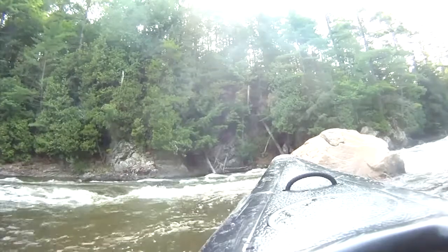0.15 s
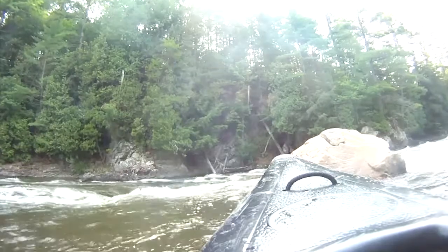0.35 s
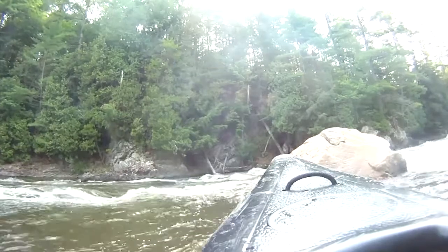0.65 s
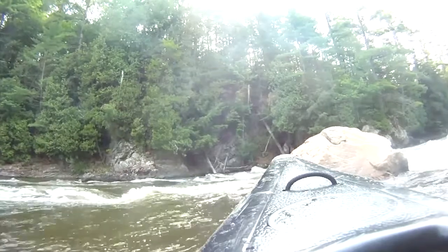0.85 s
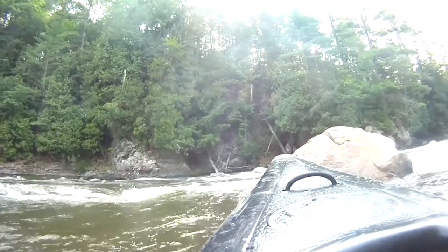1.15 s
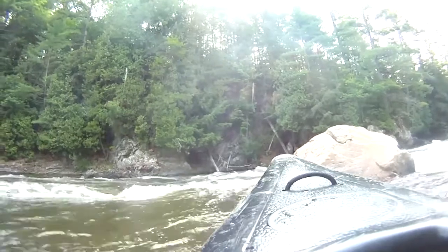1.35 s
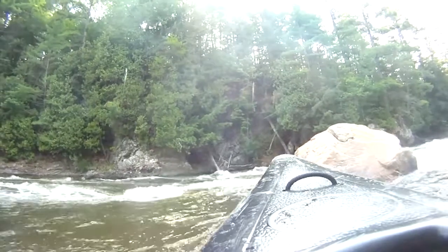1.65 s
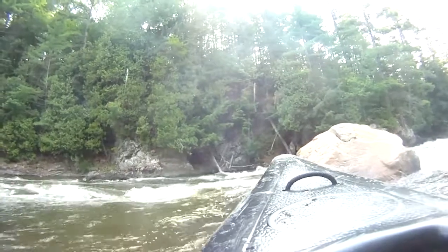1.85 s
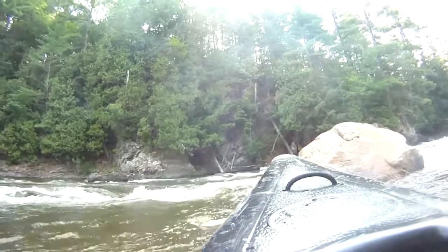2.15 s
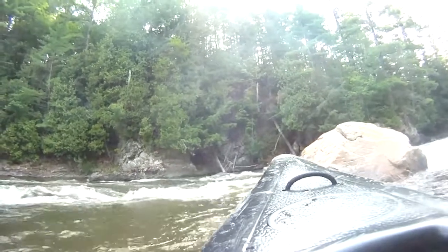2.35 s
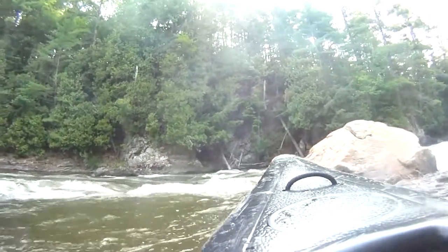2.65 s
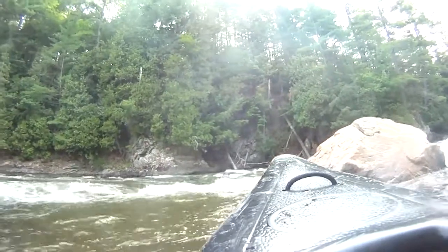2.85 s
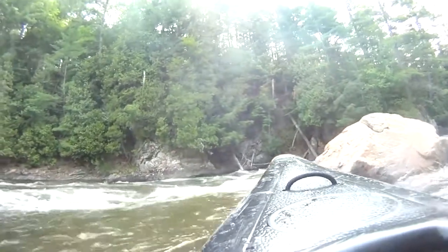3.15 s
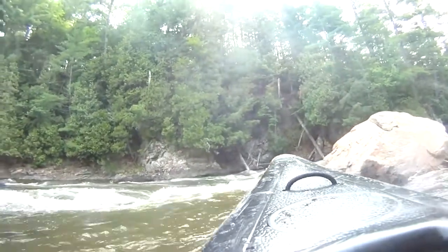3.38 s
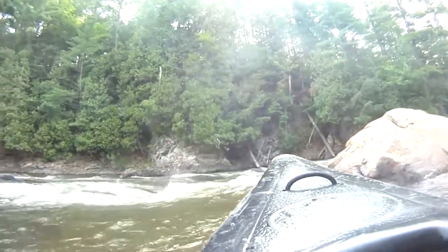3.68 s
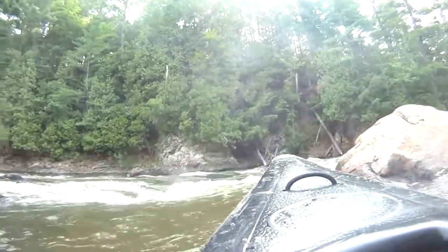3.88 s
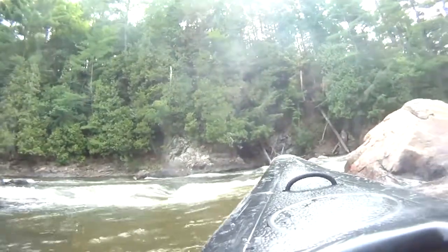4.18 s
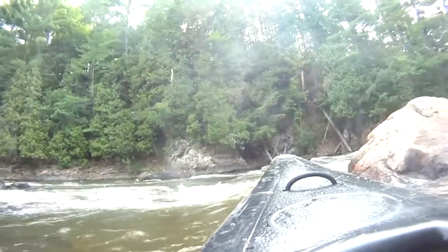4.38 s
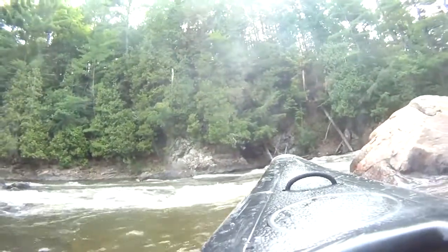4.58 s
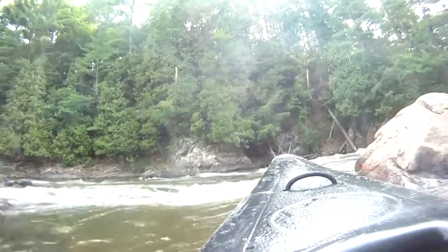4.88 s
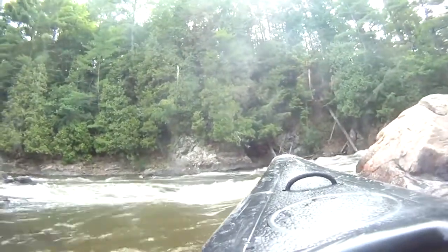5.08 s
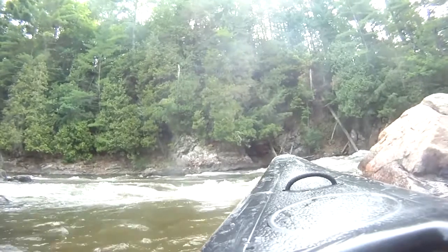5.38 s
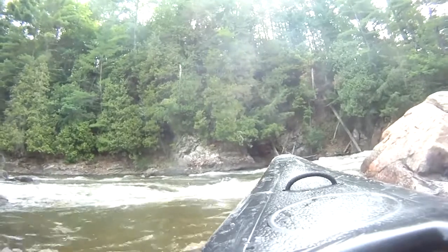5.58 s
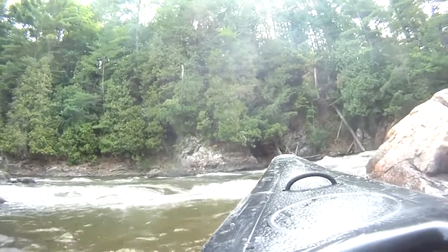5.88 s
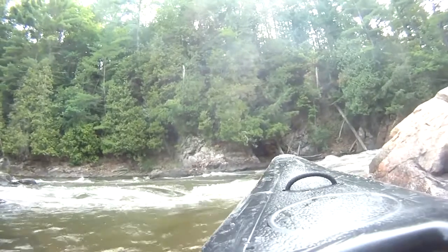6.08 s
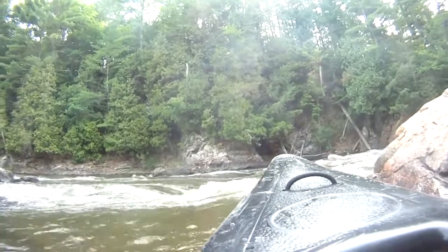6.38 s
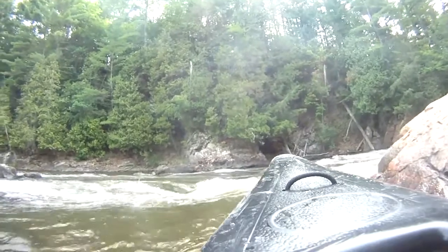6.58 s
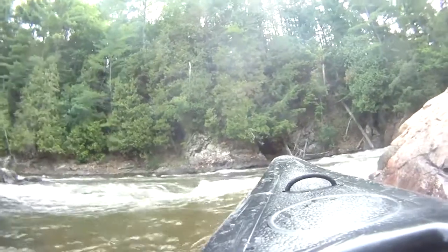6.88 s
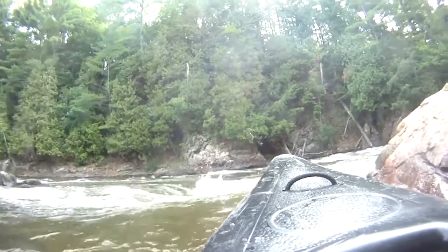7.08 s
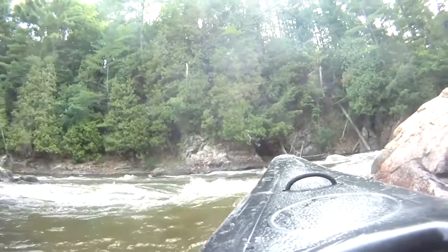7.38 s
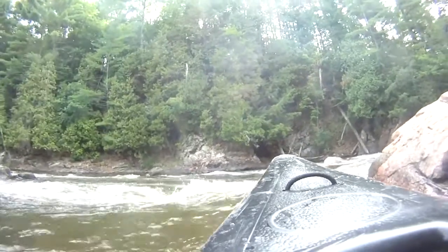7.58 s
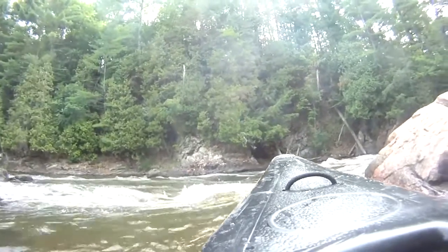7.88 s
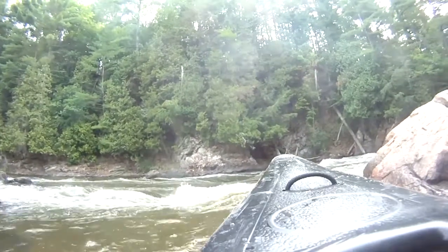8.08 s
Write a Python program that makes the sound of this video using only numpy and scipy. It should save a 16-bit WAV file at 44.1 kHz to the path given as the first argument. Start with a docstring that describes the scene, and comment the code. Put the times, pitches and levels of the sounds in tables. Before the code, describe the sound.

Heard from inside a waterproof case on a canoe, waves boom against the hull and set it rocking over a low, muffled rush of whitewater. The thumps come in uneven groups and grow heavier in the second half. Several sharp plastic knocks and short rattles cut through as the case jolts on its mount. Small bubbles, soft gurgles and a light dry crackle accompany the slaps.

```python
"""Canoe below a rapid

A canoe drifts below a river rapid, heard through a waterproof camera case fixed to its deck.
Countless bubbles merge into a steady, muffled rush; nearer ones plop singly. Waves slap the hollow
hull, which booms, rings and rocks on; a fine dry crackle follows the thumps, and water gurgles.
Harder jolts make the case knock and rattle on its mount. The recorder clips and holds its samples."""
import sys
import numpy as np
from scipy import signal
from scipy.fft import rfft, irfft, next_fast_len
from scipy.io import wavfile

SR = 44100
rng = np.random.default_rng(int(sys.argv[2]) if len(sys.argv) > 2 else 0)


def pcm_store(signal):
    """Save signal as 16-bit PCM."""
    levels = np.round(np.clip(np.atleast_2d(signal), -1, 1) * 32767)
    wavfile.write(sys.argv[1], SR, levels.astype(np.int16).T)


N = 362943
TIME = np.arange(N) / SR


def from_db(db):
    """Amplitude ratio for a level in decibels."""
    return 10 ** (np.asarray(db) / 20)


def unit_rms(x):
    """Normalisation to a root mean square of 1."""
    return x / np.sqrt(np.mean(x ** 2) + 1e-20)


def butterworth(x, hz, kind, order=2):
    """Maximally flat low- or high-pass filter."""
    sections = signal.butter(order, min(hz, .45 * SR), kind, fs=SR, output="sos")
    return signal.sosfilt(sections, x + 1e-18)


def drift(per_s):
    """Random modulation: straight lines between standard normal values."""
    knots = rng.standard_normal(N // 40)
    return np.interp(TIME * per_s, np.arange(len(knots)), knots)


def coloured_noise(spectrum, peaks=()):
    """Spectral shaping: white noise takes on a given slope and resonance peaks, at unit rms."""
    size = next_fast_len(N)
    hz = np.maximum(np.fft.rfftfreq(size, 1 / SR), 1)
    corner_hz, corner_db = np.transpose(spectrum)
    db = np.interp(np.log(hz), np.log(corner_hz), corner_db)
    for centre, width, height in peaks:
        db += height * np.exp(-((hz - centre) / width) ** 2)
    white = rfft(rng.standard_normal(size))
    return unit_rms(irfft(white * from_db(db), size)[:N])


def resonator(drive, hz, t60):
    """Damped oscillator: a unit impulse starts a unit sine that falls 60 dB in t60 seconds."""
    radius = np.exp(-np.log(1000) / (t60 * SR))
    angle = 2 * np.pi * hz / SR
    return signal.lfilter([0, np.sin(angle)], [1, -2 * radius * np.cos(angle), radius ** 2], drive + 1e-18)


def impulses(times, sizes):
    """Impulse train, with times in seconds."""
    return np.bincount(np.clip(times * SR, 0, N - 1).astype(int), sizes, N)


def chirp(hz):
    """Sine whose phase is the integral of its instantaneous frequency."""
    return np.sin(2 * np.pi * np.cumsum(hz) / SR)


def add(track, onset_s, sound):
    """Superposition of a sound on a track."""
    start = max(int(onset_s * SR), 0)
    track[start:start + len(sound)] += sound[:N - start]


def swell(age):
    """Envelope that rises from 0 to 1 at age 1, then decays."""
    return (age * np.exp(1 - age)) ** 2


# spectrum of the rapid inside the case: f/Hz, relative spectral level/dB
RAPID_SPECTRUM = [(20, 15.5), (45, 7.5), (85, 18), (130, 11), (250, 6.5), (480, 0.5), (1250, -4),
                  (1700, -0.5), (2700, -7.5), (3400, -1), (4300, -10), (5400, -9), (6000, -21.5)]
# transmission peaks of the case walls: f/Hz, width/Hz, gain/dB
WALL_PEAKS = [(695, 78, 8.5), (1063, 147, 9), (1406, 74, 8), (2079, 168, 9.5), (2392, 184, 11.5),
              (5010, 230, 7.5)]


def rapid(level_db, surge_db):
    """Incoherent summation: countless far bubbles merge into a rush that surges slightly."""
    return from_db(level_db + surge_db * drift(31)) * coloured_noise(RAPID_SPECTRUM, WALL_PEAKS)


def bubbles(per_s, level_db, t60_cycles):
    """Bubble resonance: single bubbles near the boat plop, each a damped sine."""
    births = rng.random(N) < per_s / SR
    drive = births * np.minimum(rng.exponential(1, N), 3)
    pitches = np.geomspace(600, 2500, 20)
    choice = rng.integers(0, len(pitches), N)
    plops = sum(resonator(drive * (choice == k), hz, t60_cycles / hz) for k, hz in enumerate(pitches))
    return from_db(level_db) * plops


# waves on the hull: t/s, boom level/dB, initial f/Hz, wash level/dB, rocking time/s, crackle (0-1)
WAVES = [(0.0, -16, 127, -24, 0, 0.73), (0.028, -13, 96, -40, 0.0047, 0), (0.14, -18.5, 115, -32, 0, 0.1),
         (0.178, -19.5, 200, -24.5, 0, 0), (0.349, -12.5, 114, -25.5, 0.12, 0.5),
         (0.529, -22.5, 126, -27.5, 0, 0.25), (1.130, -31.5, 377.6, -21, 0.0056, 0.8),
         (1.147, -14.5, 151, -34, 0.0079, 0), (1.377, -23, 267, -22.5, 0, 0),
         (1.407, -14.5, 113, -27, 0.11, .6), (1.922, -18.5, 229, -27, 0.15, 0.75),
         (2.234, -32, 83, -55, 0.013, 0), (2.916, -13.5, 215, -16, 0.055, 0.99),
         (3.37, -40.5, 92, -39.5, 0.057, 0), (4.032, -6, 269.5, -15, 0.1745, .6),
         (4.362, -15.5, 146.3, -20, 0.029, 0.88), (4.393, -19, 137, -25, 0.0056, 0),
         (4.83, -10, 227.7, -19, 0.17, 0.83), (5.056, -18, 174, -16.5, 0.046, 1),
         (5.122, -9.5, 121.5, -19.5, 0.036, 1), (5.824, -19.5, 230, -23, 0.03, .2),
         (5.855, -14, 200, -24, 0, 0.08), (6.49, -39.5, 100.3, -51, 0.043, 0),
         (6.652, -29.5, 292, -33, 0.0052, 0), (6.725, -7.5, 237, -14.5, .17, 0.47),
         (7.029, -9, 195, -26.5, 0.4, .7), (7.587, -12.5, 106.2, -35.5, 0.04, 0.33)]


def wave_slaps(rock_gap_s, rock_boom_db, rock_hz, rock_wash_db, rock_fade_db):
    """Damped rocking adds soft, deep slaps to the waves. Rows: t/s, boom/dB, rise/s, f/Hz, wash/dB."""
    slaps = []
    for onset, boom_db, first_hz, wash_db, rock_s, _ in WAVES:
        slaps.append((onset, boom_db, first_hz, wash_db))
        delays = rock_gap_s * np.cumsum(rng.uniform(.75, 1.1, 12))
        for delay in delays[delays < rock_s]:
            fade_db = rock_fade_db * delay / rock_s
            slaps.append((onset + delay, rock_boom_db - fade_db, rock_hz, rock_wash_db - fade_db))
    onset, boom_db, first_hz, wash_db = np.transpose(slaps)
    rise_s = 0.01789 * 2 ** ((-15 - boom_db) / 22)   # a slap 22 dB harder rises in half the time
    return np.column_stack([onset, boom_db, rise_s, first_hz, wash_db])


def hull_booms(slaps, last_hz, glide_rises, edge):
    """Dispersion: each slap is a bending wave in the hull, whose high frequencies arrive first."""
    out, t = np.zeros(N), TIME[:SR // 2]
    for onset, boom_db, rise_s, first_hz, _ in slaps:
        age = t / rise_s
        hz = last_hz + (first_hz - last_hz) * np.exp(-age / glide_rises)
        envelope = swell(age) + edge * np.exp(-2 * age)
        add(out, onset, from_db(boom_db) * envelope * chirp(hz))
    return out


# modes of the hollow hull: f/Hz, level relative to the boom/dB, T60/s
HULL_MODES = [(26.06, -15, 1), (51.82, -18.5, 1), (66.76, -10, 0.67), (84.3, -10.5, 0.6), (96.2, -16, 0.23),
              (128.5, -22, 0.23), (169.2, -28.5, 0.75), (200, -32.5, 0.75), (232, -39, 0.14),
              (293, -37.5, 0.097)]


def hull_ring(slaps, scatter_db, lowpass_hz):
    """Free vibration: at the height of each slap the hull's modes take over, in a varying balance."""
    onsets, boom_db, rise_s = slaps.T[:3]
    modes = np.zeros(N)
    for hz, mode_db, t60 in HULL_MODES:
        sizes = from_db(boom_db + mode_db + scatter_db * rng.standard_normal(len(slaps)))
        modes += resonator(impulses(onsets + rise_s, sizes), hz, t60)
    return butterworth(butterworth(modes, lowpass_hz, "low"), 12.5, "high")


# spectrum of water washing along the hull: f/Hz, relative spectral level/dB
WASH_SPECTRUM = [(20, -50), (60, 15.5), (120, 1), (200, 4), (310, -2), (370, -19.5), (430, -13), (520, -28),
                 (720, -19), (1100, -24), (2000, -35), (5000, -45)]


def wash(slaps, peak_rises, flutter_db):
    """Turbulent noise: each broken wave tumbles briefly along the hull; overlaps add in power."""
    power, t = np.zeros(N), TIME[:SR // 2]
    for onset, _, rise_s, _, wash_db in slaps:
        add(power, onset, from_db(wash_db) ** 2 * swell(t / (peak_rises * rise_s)))
    tumbling = coloured_noise(WASH_SPECTRUM) * from_db(flutter_db * drift(120))
    return np.sqrt(power) * unit_rms(tumbling)


# louder single snaps of high hiss: t/s, level/dB
LOUD_CRACKLES = [(3.027, -41), (4.223, -38), (4.556, -38.5), (6.911, -36.5), (7.133, -40), (7.312, -36)]


def crackle(per_s, delay_s, run_s, rock_share, rise_s, max_db, scatter_db, band_hz):
    """Amplitude-modulated noise: spurts of high hiss follow the thumps, for longer as the boat rocks."""
    power = np.zeros(N)
    spurt = swell(TIME[:SR // 40] / rise_s)
    for onset, _, _, _, rock_s, amount in WAVES:
        gaps, softness = rng.random((2, 60))
        offsets = 2 * (np.cumsum(gaps) - gaps[0]) / per_s
        sizes = amount * from_db(max_db - scatter_db * softness)
        for offset, size in zip(offsets[offsets <= run_s + rock_share * rock_s], sizes):
            add(power, onset + delay_s + offset, size ** 2 * spurt)
    for onset, level_db in LOUD_CRACKLES:
        add(power, onset, from_db(level_db) ** 2 * spurt)
    hiss = butterworth(rng.standard_normal(N), band_hz[0], "high")
    hiss = butterworth(hiss, band_hz[1], "low", order=4)
    return np.sqrt(power) * unit_rms(hiss)


# knocks of the case on its mount: t/s, level/dB, spectral tilt/(dB per octave)
MOUNT_KNOCKS = [(1.408, -16, -13), (1.436, -26, 0.5), (1.448, -21.5, -7), (1.519, -32, 2), (1.9455, 5, 1),
                (2.9401, -6.5, -8.5), (4.0504, -2.5, -2.5), (4.113, -13.5, 13.5), (4.174, -33.5, 9),
                (4.8524, 0.5, -1.5), (4.98, -32, -4), (5.071, -26.5, -20), (5.102, -31, 7), (6.626, -30, 0),
                (6.665, -35, -17.5), (6.736, -26, -20), (6.7417, -12.5, -9.5), (6.788, -40, -1),
                (6.811, -32, -13), (6.862, -25, -3), (6.882, -24.5, 2.5), (7.0545, -5, -5)]


def mount_contacts(bounce_s, bounce_db, level_slope, bounce_tilt):
    """Inelastic impact: each knock is followed by one light touch as the case settles."""
    touches = [(onset + bounce_s * rng.uniform(.9, 1.1), bounce_db + level_slope * db, bounce_tilt)
               for onset, db, _ in MOUNT_KNOCKS]
    return list(MOUNT_KNOCKS) + touches


# modes of the plastic case: f/Hz, relative level/dB, T60/s
CASE_MODES = [(690, -24, 0.066), (900, -51, .012), (1066, -9, 0.015), (1358, -14, 0.016), (1782, -6, 0.023),
              (1825, -18.5, 0.051), (2276, -10.5, 0.018), (3727, -8, 0.0076), (4700, -31, 0.013),
              (5000, -35, .007)]


def case_knocks(contacts, pivot_hz, band_hz, firm_scatter_db, light_scatter_db, rebound, rebound_s):
    """Impact excitation: contacts ring the case, and soft ones favour its low modes."""
    onsets, level_db, tilt = np.transpose(contacts)
    # light touches land on ever different spots, so their timbre varies more
    spread_db = np.interp(level_db, [-35, -10], [light_scatter_db, firm_scatter_db])
    modes = np.zeros(N)
    for hz, mode_db, t60 in CASE_MODES:
        scatter_db = spread_db * rng.standard_normal(len(onsets))
        sizes = from_db(level_db + mode_db + tilt * np.log2(hz / pivot_hz) + scatter_db)
        rebounds = impulses(onsets + rebound_s, rebound * sizes)   # at the end of the mount's play
        modes += resonator(impulses(onsets, sizes) + rebounds, hz, t60)
    modes = butterworth(modes, band_hz[0], "high", order=4)
    return butterworth(modes, band_hz[1], "low", order=6)


# pockets of water gurgling beside the hull: t/s, level/dB
WATER_POCKETS = [(1.537, -34.5), (2.063, -38), (3.851, -43.5), (4.905, -38), (4.99, -32.5), (5.629, -41.5),
                 (6.884, -34.5), (7.2, -44)]


def gurgles(slops, gap_s, rise_s, first_hz, step_hz, loss_db, fall, jitter_hz):
    """Sloshing: each pocket slops in short, rough, falling notes, each weaker and lower than the last."""
    out, t = np.zeros(N), TIME[:SR // 16]
    glide = 1 - fall * np.tanh(t / rise_s / 2)
    envelope = swell(t / rise_s)
    for onset, level_db in WATER_POCKETS:
        for k in range(slops):
            hz = (first_hz - step_hz * k) * glide + jitter_hz * drift(447)[:len(t)]
            add(out, onset + gap_s * k, from_db(level_db - loss_db * k) * envelope * chirp(hz))
    return out


def scene():
    """Superposition: all the sounds sum to one signal, the same in both channels."""
    river = rapid(level_db=-47, surge_db=0.62) + bubbles(per_s=18, level_db=-47.5, t60_cycles=12)
    slaps = wave_slaps(rock_gap_s=.06, rock_boom_db=-16.5, rock_hz=83.7, rock_wash_db=-38.5,
                       rock_fade_db=4)
    hull = hull_booms(slaps, last_hz=64.7, glide_rises=0.633, edge=0.033)
    hull += hull_ring(slaps, scatter_db=4.0, lowpass_hz=416)
    water = wash(slaps, peak_rises=0.93, flutter_db=1.5)
    grit = crackle(per_s=130, delay_s=0.0318, run_s=.09, rock_share=0.62, rise_s=0.0016,
                   max_db=-40.5, scatter_db=20.5, band_hz=(2680, 4820))
    contacts = mount_contacts(bounce_s=.028, bounce_db=-30, level_slope=.4, bounce_tilt=-8)
    case = case_knocks(contacts, pivot_hz=1740, band_hz=(832, 4020), firm_scatter_db=0.9,
                       light_scatter_db=6.5, rebound=0.22, rebound_s=0.00208)
    water += gurgles(slops=3, gap_s=0.086, rise_s=0.0058, first_hz=978, step_hz=101, loss_db=6,
                     fall=0.15, jitter_hz=195)
    return np.tile(river + hull + water + grit + case, (2, 1))


def record(dry):
    """Clipping and zero-order hold: peaks overload, and held samples mirror the sound into the treble."""
    hold_hz, cutoff_hz = 12000, 15500
    slow = signal.resample_poly(dry, hold_hz, SR, axis=1, window=("kaiser", 3))
    clipped = np.clip(slow, -.88, .88)
    steps = np.repeat(clipped, 8, axis=1)
    held = signal.resample_poly(steps, SR, 8 * hold_hz, axis=1)[:, :N]
    lowpass = signal.ellip(10, .2, 70, cutoff_hz, fs=SR, output="sos")
    return signal.sosfilt(lowpass, held)


dry = scene()
out = record(dry)
pcm_store(out)
```